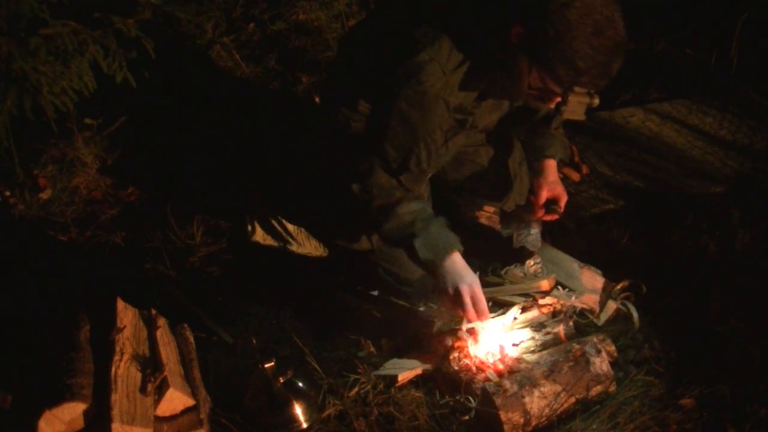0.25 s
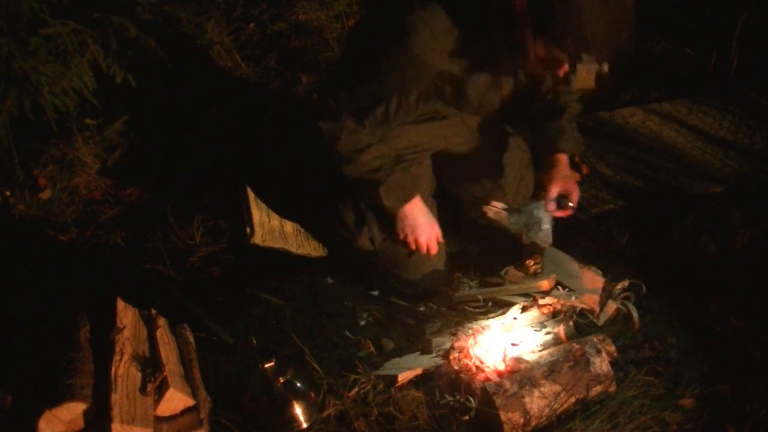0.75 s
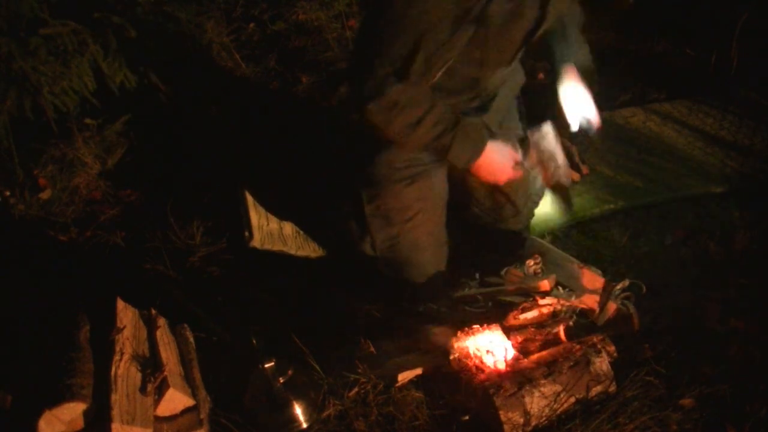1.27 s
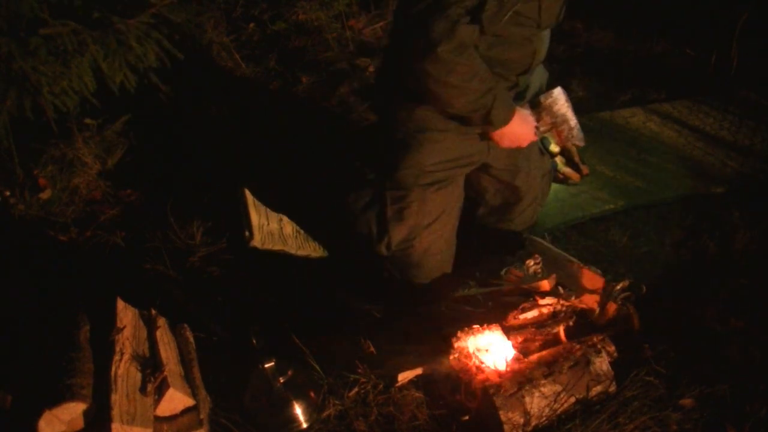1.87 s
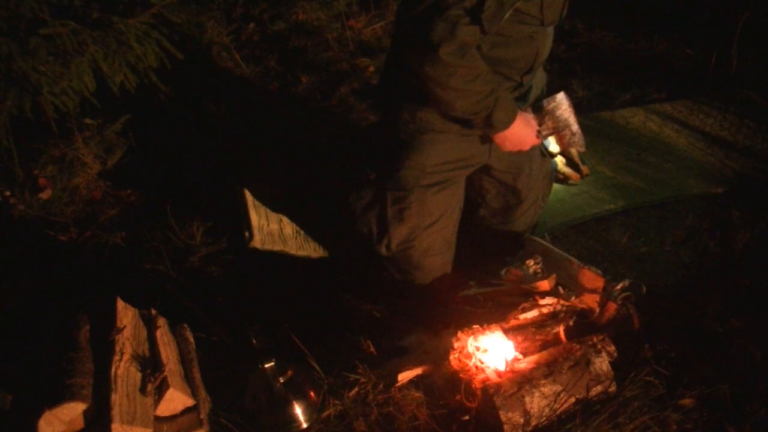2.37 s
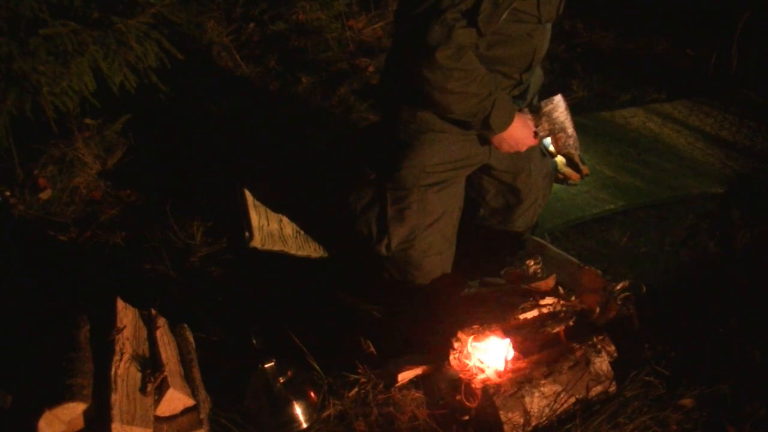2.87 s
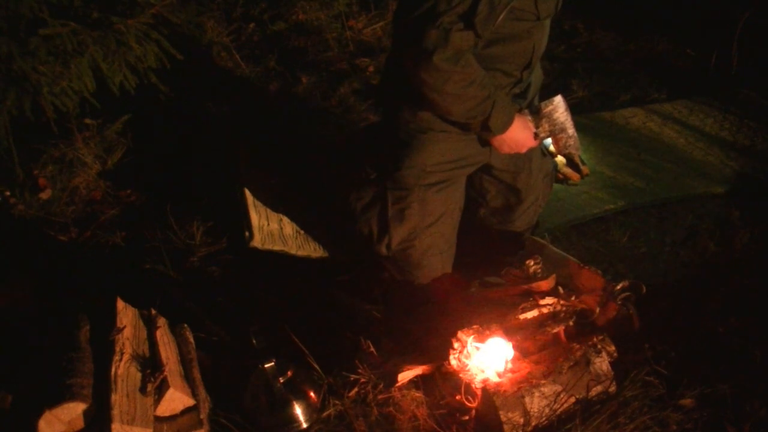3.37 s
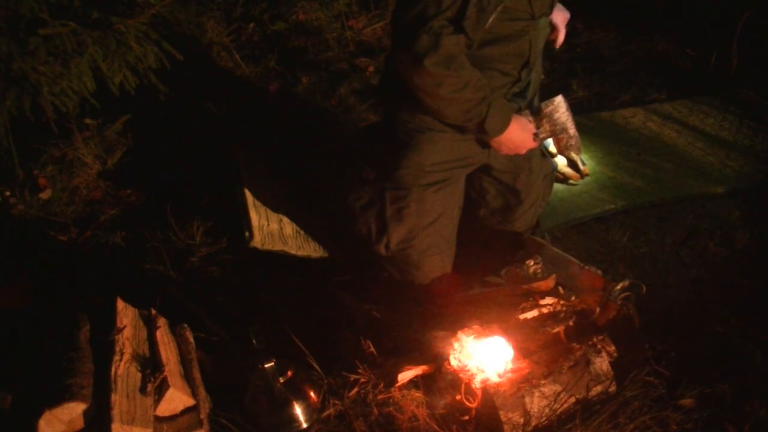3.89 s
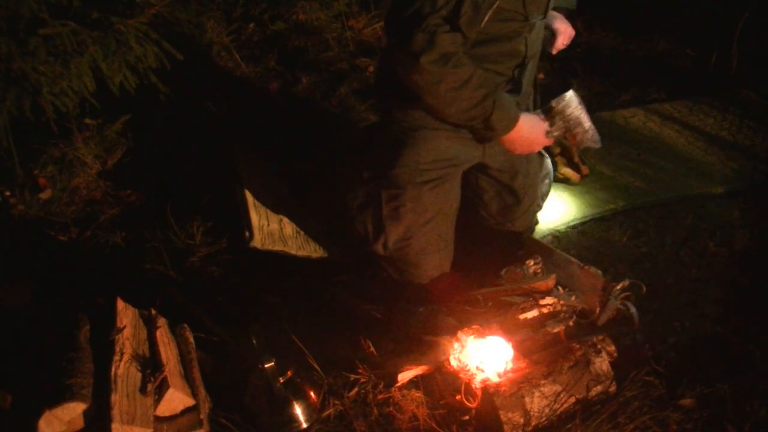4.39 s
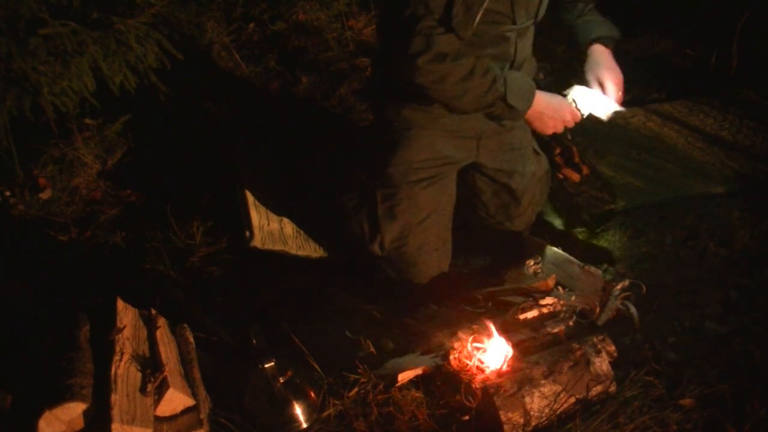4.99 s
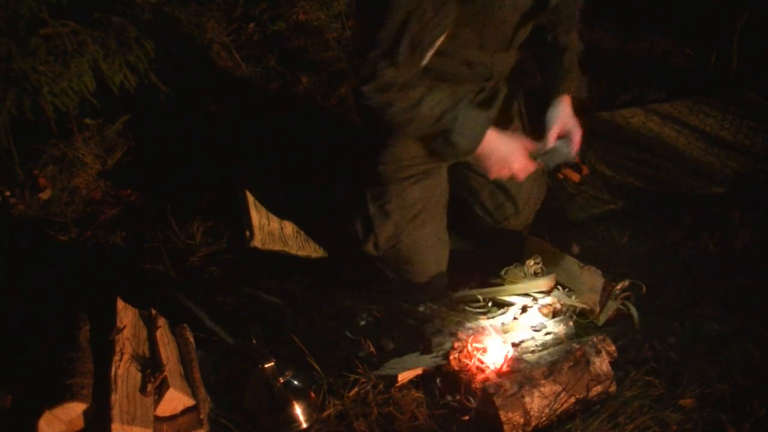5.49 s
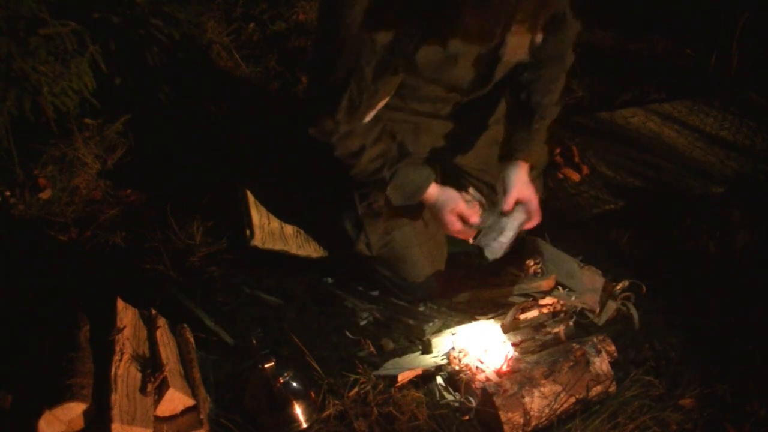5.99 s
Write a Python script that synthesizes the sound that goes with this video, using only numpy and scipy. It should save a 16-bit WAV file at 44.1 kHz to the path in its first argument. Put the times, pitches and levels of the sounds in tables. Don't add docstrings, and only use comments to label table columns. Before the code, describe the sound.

A small wood fire ticks, fizzes and pops softly at night while hands rustle, knock and sharply crack dry bark in a hushed forest.

```python
import sys
import numpy as np
from scipy import signal
from scipy.fft import rfft, irfft, next_fast_len
from scipy.io import wavfile
from scipy.ndimage import uniform_filter1d, map_coordinates

SR = 44100
rng = np.random.default_rng(int(sys.argv[2]) if len(sys.argv) > 2 else 0)


def unload_audio(sound):
    columns = np.transpose(np.atleast_2d(sound))
    steps = np.round(np.clip(columns, -1, 1) * 32767)
    wavfile.write(sys.argv[1], SR, steps.astype(np.int16))


def gain_from_db(level_db):
    decades = np.asarray(level_db, float) / 20
    return 10 ** decades


N = 275625


def unit(x):
    return x / np.sqrt(np.mean(x ** 2) + 1e-20)


def crest(spectrum):
    x = irfft(spectrum)
    return x / np.abs(x).max()


def along(points, hz):
    f, v = np.transpose(points)
    return np.interp(np.log(hz + 1), np.log(f + 1), v)


def wobble(rate_hz):
    knots = rng.standard_normal(int(N * rate_hz / SR) + 4)
    return map_coordinates(knots, [np.arange(N) * rate_hz / SR])


def coloured(x, spectrum):
    size = next_fast_len(N + 8192)
    gain = gain_from_db(along(spectrum, np.fft.rfftfreq(size, 1 / SR)))
    return unit(irfft(rfft(x, size) * gain, size)[:N])


def gritty(grain_db):
    return gain_from_db(grain_db * wobble(900)) * rng.standard_normal(N)


def peak(f, hz, width_hz):
    return 1j * f * width_hz / (hz * hz - f * f + 1j * f * width_hz)


def add(out, s, sound):
    out[round(s * SR):][:len(sound)] += sound


def evened(spectrum):
    evening = 0.8
    power = uniform_filter1d(np.abs(spectrum) ** 2, size=25) + 1e-9
    c = irfft(-evening / 2 * np.log(power))
    c[1:len(c) // 2] *= 2
    c[len(c) // 2 + 1:] = 0
    return spectrum * np.exp(rfft(c))


def snaps(rows):
    out, size = np.zeros(N + SR), 2048
    t, f = np.arange(size) / SR, np.fft.rfftfreq(size, 1 / SR)
    thin = (1j * f / (1300 + 1j * f)) ** 3
    for s, db, hz, body_db, thud_db, spit_db, air_db, t60 in rows:
        decay = gain_from_db(-60 * t / np.clip(t60, 0.002, 0.04))
        burst = rng.standard_normal(size) * decay * (1 - np.exp(-t / 0.00025))
        burst[6] = 3
        blow = evened(rfft(burst))
        dull = 1 / (1 + 1j * f / (hz + 4000)) ** 6
        body = peak(f, 0.9 * hz, 3700) ** 2 + 0.2 * peak(f, 0.5 * hz, 1600)
        ring = crest(blow * (peak(f, hz, 400) + gain_from_db(body_db) * body) * dull * thin)
        thud = crest(blow * peak(f, 970, 760) ** 2)
        spit = crest(blow * peak(f, 7950, 1960) ** 2)
        air = crest(blow * (peak(f, 15200, 2400) ** 2 + 0.25 * peak(f, 11800, 1500) ** 2))
        snap = ring + gain_from_db(thud_db) * thud + gain_from_db(spit_db) * spit - gain_from_db(air_db) * air
        add(out, s - 0.0004, gain_from_db(db + 2) * snap)
    return out[:N]


def strokes(rows, spectrum):
    level = np.zeros(N + SR)
    for s, length, db in rows:
        swell = np.sin(np.linspace(0, np.pi, int(length * SR)))
        add(level, s, gain_from_db(db) * swell)
    return level[:N] * gain_from_db(1.5 * wobble(120)) * coloured(gritty(2.6), spectrum)


# f/Hz, level/dB per Hz
FRONT_SPECTRUM = [(15, -37), (25, -26), (166, -9), (217, -5), (309, -3.5), (531, -4), (734, -5), (1130, -6),
                  (1400, -8), (4030, -7.5), (16000, -19)]
# f/Hz, level/dB per Hz
FLANK_SPECTRUM = [(15, -53), (25, -27.5), (212, -5), (354, -4), (531, -8.5), (575, -7.5), (5000, -22.5),
                  (11000, -37), (16000, -86)]


def forest():
    front = gain_from_db(5.5 + 0.58 * wobble(5.82)) * coloured(rng.standard_normal(N), FRONT_SPECTRUM)
    flank = gain_from_db(4.5 + 2.1 * wobble(6)) * coloured(rng.standard_normal(N), FLANK_SPECTRUM)
    return gain_from_db(-66.5) * np.array([front + flank, front - flank])


# t/s, fizz level/dB
BURN = [
    (0, -61),
    (1.29, -54),
    (1.74, -57.5),
    (2.28, -60),
    (2.92, -68),
    (3.45, -56.5),
    (3.92, -65),
    (5.1, -56),
    (5.45, -56.5),
    (6.25, -51),
]
# f/Hz, level/dB per Hz
SIZZLE_SPECTRUM = [(700, -8), (1300, 5.5), (1700, 6.5), (2300, -27), (3500, -53)]
# f/Hz, level/dB per Hz
BARK_SPECTRUM = [(100, -92), (300, -37), (1000, -8), (1700, -5), (2400, -6), (4700, 1.5), (6300, -10),
                 (7800, -7.5), (9800, -24.5), (16000, -28)]


def fire():
    fizz_db = np.interp(np.arange(N) / SR, *np.transpose(BURN))
    sap_db = -75.5 - 0.26 * (fizz_db - fizz_db.mean())
    sizzle = gain_from_db(sap_db + 2.9 * wobble(25)) * coloured(gritty(0.95), SIZZLE_SPECTRUM)
    fizz = gain_from_db(fizz_db - 8 + 1.1 * wobble(13)) * coloured(gritty(3.2), BARK_SPECTRUM)
    size = gain_from_db(2 * rng.exponential(size=N).clip(0, 3)) * rng.standard_normal(N)
    specks = (rng.random(N) < 0.001) * size
    speck_spectrum = [(1000, -30), (4500, -4), (6000, -10), (8000, 4), (11000, -4), (15000, -9)]
    return sizzle + fizz + gain_from_db(-83) * coloured(specks, speck_spectrum)


# t/s, step level/dB
MOTOR = [
    (0, -53),
    (.4, -52),
    (1.2, -53),
    (2.0, -54),
    (2.62, -52),
]
# f/Hz, width/Hz, level/dB
HOUSING = [(162, 52, 3.5), (410, 82, 3)]
# f/Hz, width/Hz, level/dB
GEARS = [(1345, 270, 4.5), (1664, 175, 6)]


def motor():
    step_hz, rattle_t60_s = 25, 0.082
    at = np.arange(0.0075, MOTOR[-1][0], 1 / step_hz)
    size = gain_from_db(np.interp(at, *np.transpose(MOTOR)) + rng.normal(0, 2.14, (2, len(at))))
    out, t = np.zeros(N + SR), np.arange(SR // 20) / SR
    f = np.fft.rfftfreq(len(t) - 1, 1 / SR)
    housing = sum(gain_from_db(db) * peak(f, hz, width) for hz, width, db in HOUSING)
    thump = crest(housing * (1j * f / (110 + 1j * f)) ** 2)
    gears = sum(gain_from_db(db) * peak(f, hz, width) ** 2 for hz, width, db in GEARS)
    for s, low, high in zip(at, *size):
        chatter = rfft(rng.standard_normal(len(t) - 1) * gain_from_db(-60 * t[1:] / rattle_t60_s))
        add(out, s, low * thump)
        add(out, s - 0.003, gain_from_db(-5) * high * crest(chatter * gears))
    return out[:N]


# t/s, peak/dB
TICKS = [(.0152, -50.5), (.227, -50), (.309, -52), (.6588, -47), (0.774, -48), (.9404, -48.5),
         (1.5332, -49), (1.9722, -55), (2.264, -49), (2.392, -49.5), (2.427, -53), (2.5698, -49),
         (4.231, -52), (4.2359, -50), (4.5203, -41.5), (4.551, -49), (4.5764, -50), (5.181, -45),
         (5.3157, -50), (5.4115, -48), (5.5232, -50), (5.7347, -47), (5.748, -52), (5.842, -51),
         (5.8862, -45), (5.9258, -45), (6.0853, -44), (6.228, -40)]


def ticks():
    rows = []
    for s, db in TICKS:
        hz = 4480 * np.exp(0.049 * rng.standard_normal())
        t60 = 0.0078 * np.exp(0.5 * rng.standard_normal())
        rows.append((s, db, hz, -10.5, -38, -4, -14, t60))
    return snaps(rows)


# t/s, length/s, level/dB
PRESSES = [(.044, .03, -59.5), (.361, 0.016, -58), (.44, 0.021, -56), (.665, .047, -56), (1.185, 0.24, -65),
           (2.844, 0.037, -57), (3.162, 0.025, -47), (3.19, 0.015, -42), (3.202, 0.022, -47.5),
           (3.213, 0.051, -59.5), (4.113, 0.11, -58), (4.343, 0.022, -49), (5.035, 0.07, -55),
           (5.397, 0.045, -54)]
# t/s, length/s, level/dB, brightness/dB
RUBS = [(0.993, .04, -64, 13.5), (1.045, 0.034, -50, 9), (1.08, 0.03, -50.5, 9.5), (1.09, 0.12, -55.5, 8),
        (1.166, 0.018, -62.5, 20), (1.395, 0.049, -64, 12.5), (3.34, 0.077, -60.5, 2),
        (3.52, 0.13, -60, 12.5), (3.6, .053, -61, 10), (3.725, .077, -64, 9), (4.42, .062, -67, 14),
        (4.5, 0.048, -63, 10), (4.995, 0.043, -45.5, 3), (5.13, 0.052, -51.5, 1), (5.444, 0.043, -56.5, 2),
        (5.493, 0.18, -61.5, 10), (5.625, 0.032, -56, 12), (5.66, .035, -60, 9), (5.712, .056, -52.5, 9),
        (5.773, 0.059, -55.5, 8), (5.873, 0.078, -50.5, 6), (5.934, 0.075, -51, 5.5), (6.018, 0.08, -53, 7),
        (6.092, .088, -59, 13.5), (6.156, 0.052, -62.5, 20), (6.203, 0.026, -64.5, 20)]


def rubs():
    body = strokes(PRESSES + [row[:3] for row in RUBS], BARK_SPECTRUM)
    bright = [(hz, db + 9 * np.log2(hz / 6000)) for hz, db in BARK_SPECTRUM]
    hiss_rows = [(s, length, db + 1.91 * bright_db - 22.5) for s, length, db, bright_db in RUBS]
    return body + strokes(hiss_rows, bright)


# t/s, peak/dB, ring f/Hz, t60/s
POPS = [(0.054, -52, 4480, 0.0063), (0.3703, -50, 1510, 0.023), (.449, -58, 4520, 0.018),
        (1.3616, -46, 3060, .003), (1.9078, -44.5, 3170, 0.023), (2.2143, -49, 3040, .007),
        (2.217, -47.5, 2780, .015), (2.61, -48, 1630, 0.026), (3.3443, -46.5, 3200, 0.024),
        (3.638, -50, 1560, .013), (3.7258, -51.5, 2240, 0.0066), (4.3506, -30, 3450, .0066),
        (4.365, -51, 2220, .019), (4.6519, -51.5, 4540, .015), (5.1446, -45, 4690, 0.011),
        (5.166, -54, 4520, 0.0046), (5.3814, -51, 4220, .016), (5.645, -45, 3140, 0.0067)]


def pops():
    return snaps([(s, db, hz, -10.5, -11, -39.5, -49.5, t60) for s, db, hz, t60 in POPS])


# t/s, peak/dB, spit/dB, t60/s, air/dB
SPARKS = [(.127, -49.5, 5, 0.0027, -8), (1.0652, -39, 2, .012, -5), (1.0676, -30, -4.5, .0042, -14),
          (1.099, -33.5, -3.5, 0.0063, -12), (1.1691, -45, 4, .008, -5), (1.1762, -48, 8, 0.011, -2),
          (1.812, -53, 8, .003, 0), (1.828, -45.5, 2, .003, -6), (2.5133, -45.5, 4, .005, -6),
          (2.9119, -33, -8, 0.004, -12), (2.995, -51, 0, .008, -8), (3.1692, -44, 6, 0.008, -15),
          (3.5963, -34.5, -9, 0.018, -17), (3.7963, -47.5, 5.5, .0074, -8), (3.8262, -46, 1, 0.012, -10),
          (3.9112, -45.5, -2, 0.013, -10), (4.6092, -51, 6, .0064, -2), (4.6183, -34, -3, 0.006, -8),
          (4.671, -53, 1, .004, -7), (4.793, -40, -7, 0.006, -3), (4.843, -50, 0, .004, -6),
          (5.122, -59, 3, .005, -5), (5.33, -56, -3, .004, 4), (5.4535, -39, -4, .006, -3),
          (5.5866, -41, -3, 0.004, -11), (5.629, -48, 2, 0.0057, -8), (6.1638, -42, -4, .009, -12),
          (6.219, -33, 0, 0.006, -14), (6.2355, -22, 1, 0.0061, -16)]


def sparks():
    rows = []
    for s, db, spit_db, t60, air_db in SPARKS:
        hz = 4800 * np.exp(0.024 * rng.standard_normal())
        rows.append((s, db, hz, -5, -24, spit_db, air_db, t60))
    return snaps(rows)


# t/s, peak/dB, ring f/Hz, t60/s, broad body/dB
SPLITS = [(.663, -41.5, 3770, 0.0028, -10), (1.674, -40.5, 4240, 0.011, -10),
          (2.0864, -46, 4640, .015, -10), (2.2866, -45.5, 4600, .006, -10), (2.5121, -35, 3200, 0.008, -3),
          (4.9784, -28, 3600, .01, 2), (5.258, -36, 4560, 0.013, -10), (5.4212, -32, 4300, 0.006, -3),
          (5.4273, -32, 3900, 0.011, -8), (5.4632, -38, 4900, .006, -8), (5.5697, -39, 3300, 0.004, -4),
          (5.8945, -42, 4800, .015, -8), (5.9845, -45, 4500, .008, -4), (6.025, -45, 4330, .008, -8),
          (5.7418, -48, 4800, .021, -10), (5.917, -36.5, 3630, .0037, -10), (5.9461, -31, 5170, 0.005, -12),
          (6.1795, -39, 4570, 0.0078, -22), (6.1872, -17, 4180, 0.003, -12),
          (6.2152, -36, 4400, .0046, -14), (6.2344, -10.5, 4440, 0.003, -12),
          (6.2412, -38, 4440, .003, -10), (6.2438, -37, 4800, .003, -8)]


def splits():
    return snaps([(s, db, hz, body_db, -33, -14.5, -24.5, t60) for s, db, hz, t60, body_db in SPLITS])


# t/s, peak/dB, f/Hz, t60/s
FLAKES = [(2.845, -31, 2300, .02), (2.852, -43, 2330, .07), (2.8462, -36, 1300, .014),
          (2.846, -42, 1750, .014), (2.846, -46, 420, .03), (4.9786, -34, 5600, .012),
          (4.9786, -36, 1500, .008), (6.1873, -20, 4200, .009), (6.219, -38, 4300, .01),
          (6.2355, -36, 11500, .012), (4.618, -48, 1900, .006), (1.674, -50, 1800, .008),
          (3.191, -33, 1250, .014), (4.992, -41, 905, .06), (4.993, -45, 457, .07),
          (4.3503, -40, 1680, .02), (4.3503, -45, 650, .012), (4.3555, -42, 4200, .015),
          (2.512, -47, 2120, .02), (3.1755, -40, 3350, .06), (3.1865, -40, 3200, .03),
          (3.1908, -24, 4600, .012), (5.0375, -29, 3450, .012), (5.0355, -30, 6100, .005),
          (5.0445, -28, 3480, .012), (5.0445, -36, 1900, .015), (5.138, -40, 5000, .02),
          (5.256, -50, 1480, .03), (1.066, -51, 960, .025), (6.234, -27, 950, .007),
          (6.2343, -29, 2030, .008), (6.179, -38, 4550, .012), (5.4275, -41, 2800, .015),
          (5.428, -44, 5300, .015), (5.429, -47, 1700, .025)]


def flakes():
    out, t = np.zeros(N + SR), np.arange(SR // 10) / SR
    for s, db, hz, t60 in FLAKES:
        ring = gain_from_db(db - 60 * t / t60) * np.sin(2 * np.pi * hz * t)
        add(out, s, ring * (1 - np.exp(-t / 0.0007)))
    return out[:N]


# t/s, level/dB, pitch f/Hz, upper modes/dB
KNOCKS = [
    (1.908, -42, 838, -19),
    (2.068, -50, 850, -16),
    (2.845, -30.5, 829, -5),
    (3.191, -29.5, 822, -11),
]
# f/Hz, level/dB, t60/s
HOLLOW = [(827, -6, 0.1), (843, -6, 0.1), (2346, -12, 0.05), (3650, -6, 0.09), (3240, -11, 0.05),
          (3410, 2, 0.03), (4350, -12, 0.087)]


def knocks():
    out, t = np.zeros(N + SR), np.arange(SR // 5) / SR
    for s, db, pitch_hz, upper_db in KNOCKS:
        ring = np.zeros(len(t))
        for hz, level_db, t60 in HOLLOW:
            chance_db = (hz > 1500) * (upper_db + rng.normal(0, 3))
            mode = np.sin(2 * np.pi * hz * pitch_hz / 834 * t)
            ring += gain_from_db(level_db + chance_db - 60 * t / t60) * mode
        add(out, s, gain_from_db(db) * ring * (1 - np.exp(-t / 0.003)))
    return out[:N]


# t/s, peak/dB, ring f/Hz, t60/s, broad body/dB
CRACKS = [(2.8451, -23.5, 3500, 0.003, -14), (2.8470, -24, 3700, .007, -14), (2.869, -44, 3300, .008, -12),
          (2.947, -48, 3250, .011, -10), (3.1543, -33, 3150, 0.006, -20), (3.1654, -35, 3300, .016, -12),
          (3.1908, -22, 3250, 0.006, -18), (3.1915, -19, 3200, .008, -18), (3.1945, -30, 4300, .03, -8),
          (3.2075, -40, 4400, .02, -12), (3.216, -41, 4200, .008, -8), (4.9903, -14, 6000, .004, -8),
          (4.9911, -14, 6200, .004, -10), (4.9927, -12, 4900, .004, -12), (4.9948, -15, 5470, .0075, -14),
          (4.9968, -20, 4400, 0.012, -8), (5.0134, -26, 3480, 0.013, -6), (5.022, -27, 3450, .008, -12),
          (5.0352, -19, 3600, .004, -20), (5.036, -14, 3550, 0.0065, -18), (5.044, -24, 3500, 0.008, -8),
          (5.0497, -34, 3400, .008, -12), (5.061, -42, 3700, .008, -16), (5.0927, -44, 4310, .008, -10),
          (5.1378, -33, 5000, 0.015, -14), (6.1123, -43, 4650, .014, -10)]


def cracks():
    return snaps([(s, db, hz, body_db, -29, -39, -49, t60) for s, db, hz, t60, body_db in CRACKS])


# t/s, length/s, level/dB
CREAKS = [
    (2.848, 0.046, -52),
    (3.16, 0.039, -44.5),
    (3.188, 0.019, -39.5),
    (3.209, 0.014, -54),
    (3.34, 0.069, -59),
    (5.0, 0.026, -53),
    (5.046, 0.026, -51),
]
# f/Hz, level/dB per Hz
CREAK_SPECTRUM = [(700, -60), (1800, -21), (2300, -7), (2750, -21), (3300, 1), (3950, -16), (4600, -8),
                  (6500, -44)]


def creaks():
    return strokes(CREAKS, CREAK_SPECTRUM)


# t/s, length/s, level/dB
THUMPS = [
    (4.347, 0.012, -56),
    (4.99, 0.025, -53),
    (5.03, 0.036, -59),
]
# f/Hz, level/dB per Hz
FLEX_SPECTRUM = [(100, -46), (300, -8.5), (450, 5), (700, -2), (1500, -39), (4000, -90)]


def thumps():
    return strokes(THUMPS, FLEX_SPECTRUM)


# t/s, length/s, level/dB
SHUFFLE = [
    (5.55, 0.32, -83),
    (5.85, 0.61, -84),
]
# f/Hz, level/dB per Hz
EARTH_SPECTRUM = [(15, -30), (40, -7), (90, -1), (160, -10), (400, -70)]


def shuffle():
    return strokes(SHUFFLE, EARTH_SPECTRUM)


# f/Hz, t60/s
GROUND = [(500, 0.066), (3000, 0.026), (10000, 0.054)]


def scatter(x):
    out, hop = np.zeros((2, N + SR)), SR // 4
    for start in range(0, N, hop):
        hz, t, z = signal.stft(rng.standard_normal((2, SR // 6)), SR, nperseg=128)
        decay = gain_from_db(-60 * t / along(GROUND, hz)[:, None])
        mid, side = signal.istft(z * decay, SR, nperseg=128)[1]
        tail = mid + 0.44 * side * np.array([[1], [-1]])
        tail = tail / np.linalg.norm(tail[0])
        answer = signal.fftconvolve(x[None, start:start + hop], tail, axes=1)
        out[:, start + 60:][:, :answer.shape[1]] += answer
    return out[:, :N]


def scene():
    hits = ticks() + pops() + sparks() + splits() + flakes() + cracks()
    hands = rubs() + knocks() + creaks() + thumps() + shuffle()
    near = hits + hands + fire() + motor() + gain_from_db(-9.5) * scatter(hits)
    lowpass = signal.butter(2, 9000, fs=SR, output="sos")
    lean = signal.sosfiltfilt(lowpass, near.mean(0))
    return near + 0.14 * lean * np.array([[-1], [1]]) + forest() * gain_from_db([[-0.6], [0.6]])


def top_cut(x):
    return signal.sosfilt(signal.butter(12, 16660, fs=SR, output="sos"), x)


def record(dry):
    f, spectrum = np.fft.rfftfreq(N, 1 / SR), rfft(dry)
    top = irfft(spectrum * (f >= 15850) * (f < 16500), N)
    level = np.sqrt(np.abs(uniform_filter1d((top ** 2).mean(0), size=300)))
    kept = np.clip(0.25 * (level / np.median(level) - 3), gain_from_db(-22), 1)
    mix = irfft(spectrum * (f < 15850), N) + kept * top
    return top_cut(mix)


dry = scene()
out = record(dry)
unload_audio(out)
```